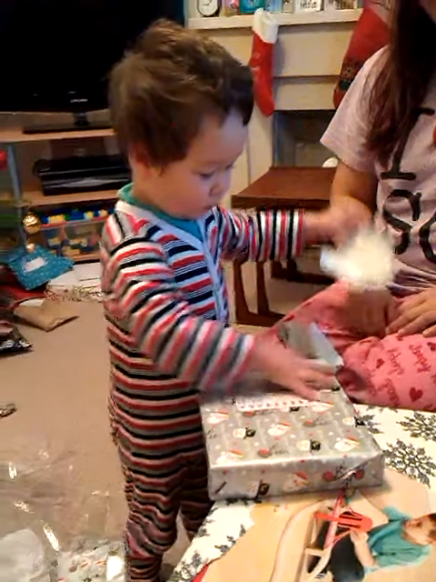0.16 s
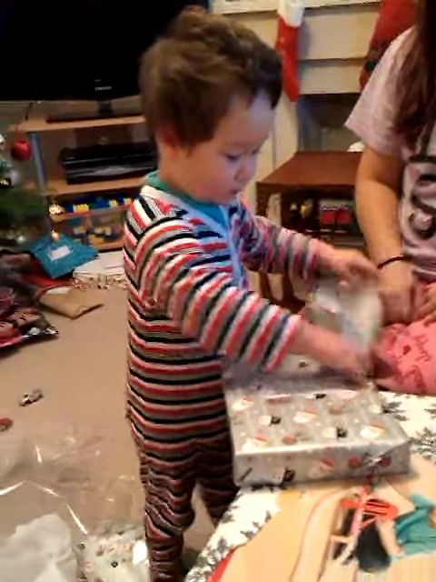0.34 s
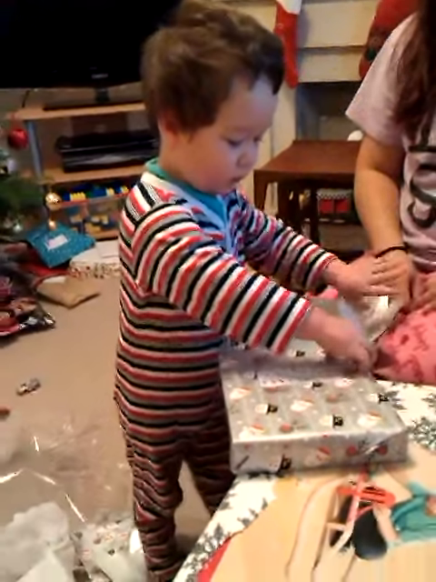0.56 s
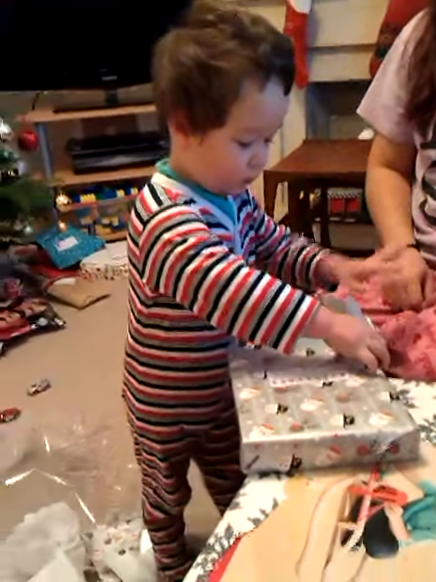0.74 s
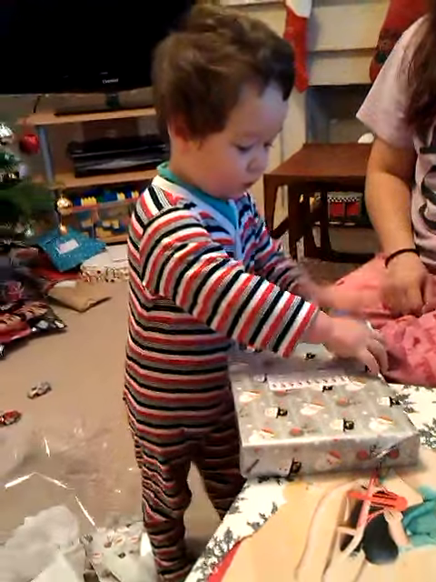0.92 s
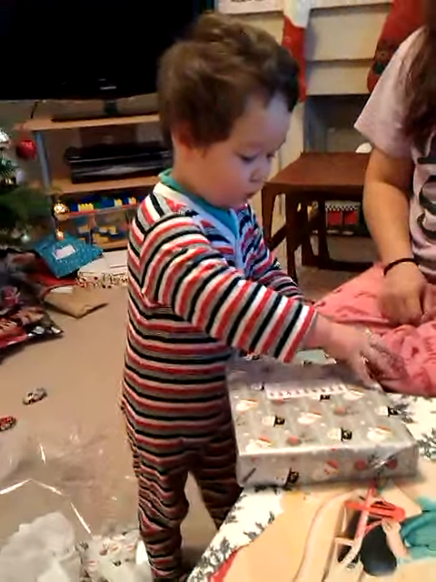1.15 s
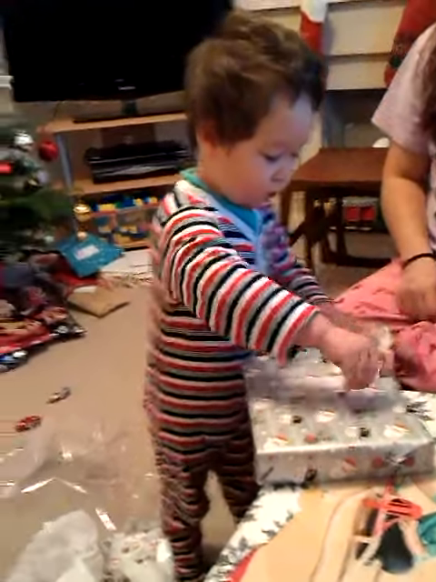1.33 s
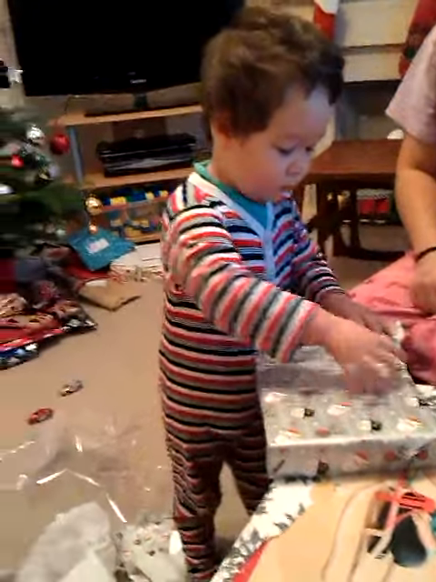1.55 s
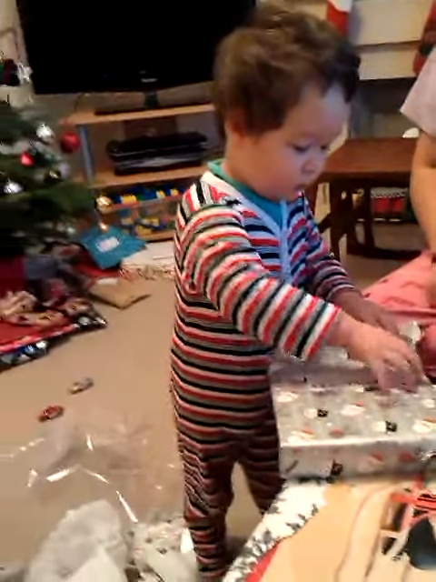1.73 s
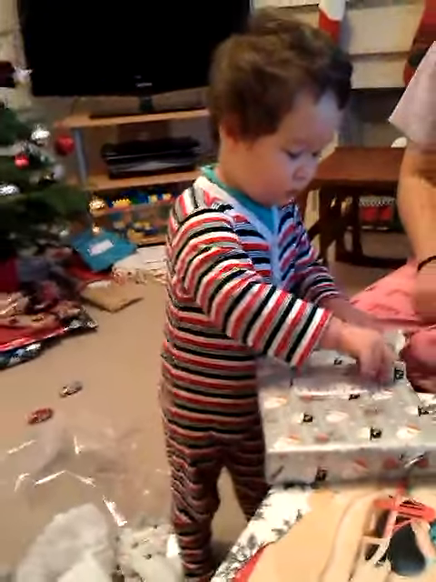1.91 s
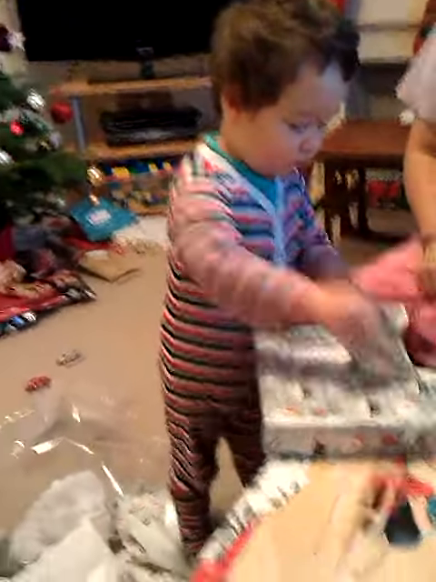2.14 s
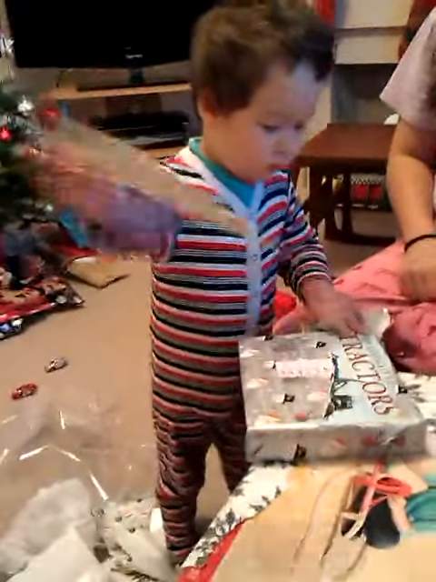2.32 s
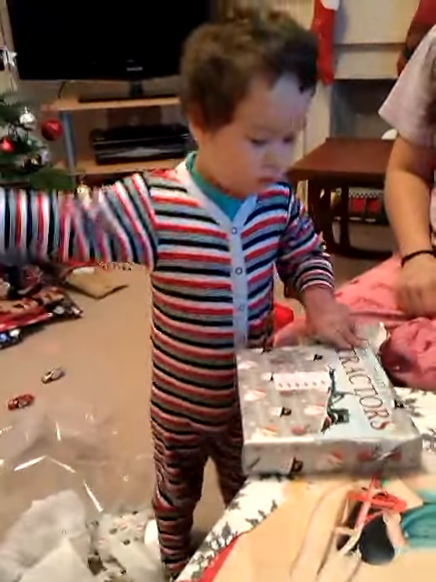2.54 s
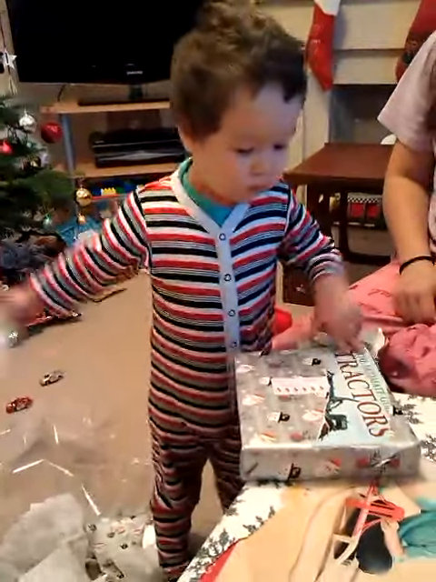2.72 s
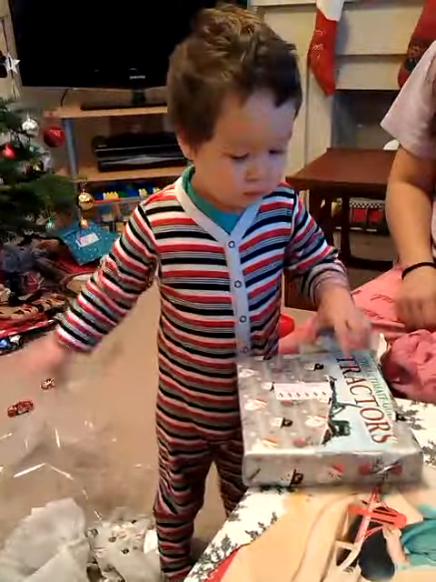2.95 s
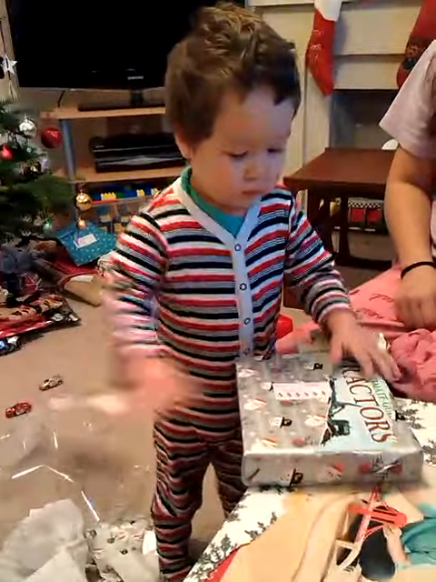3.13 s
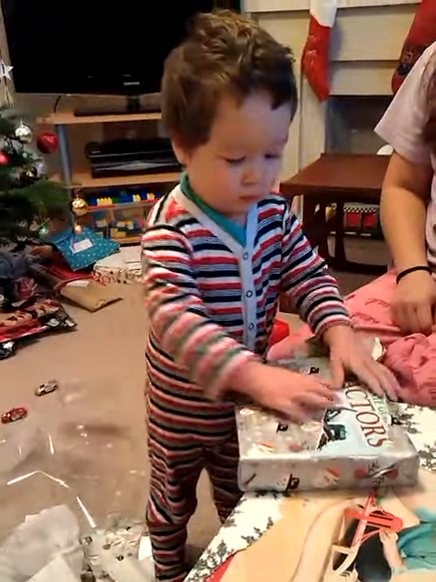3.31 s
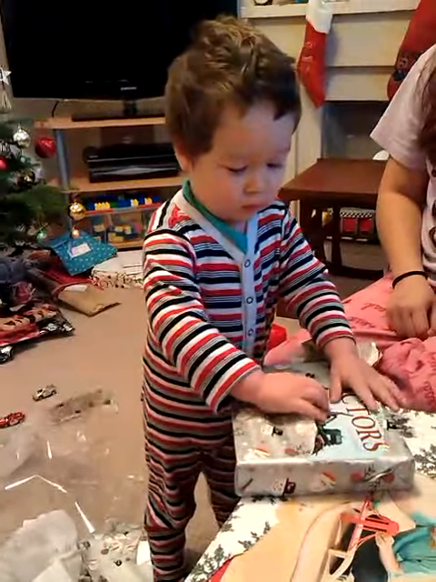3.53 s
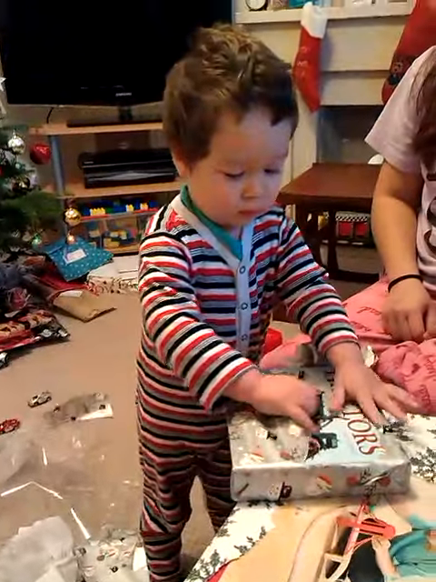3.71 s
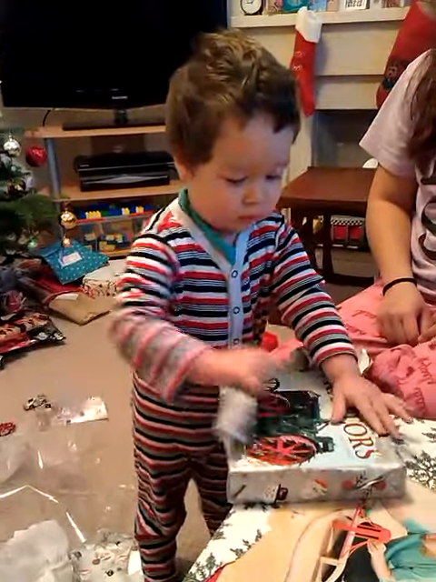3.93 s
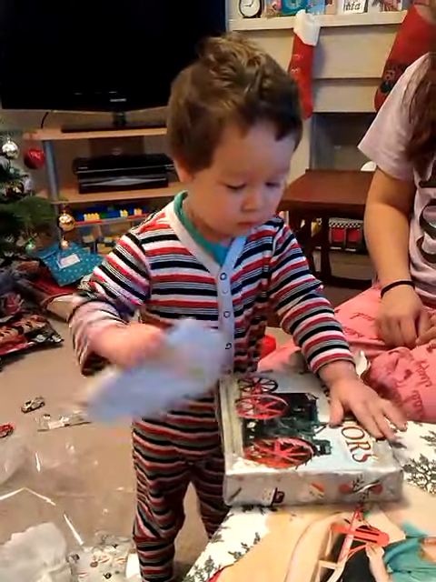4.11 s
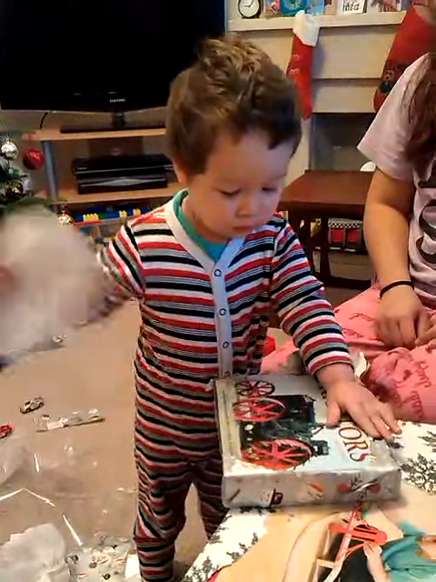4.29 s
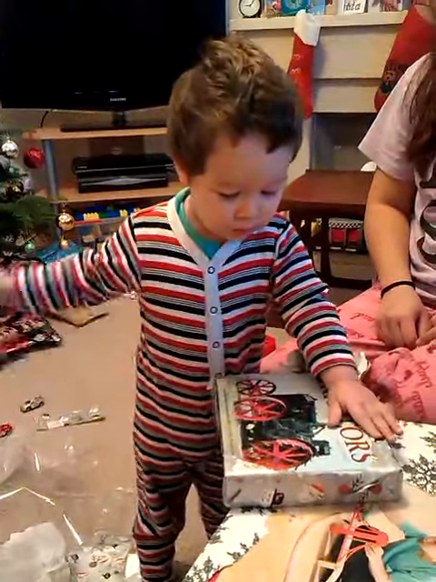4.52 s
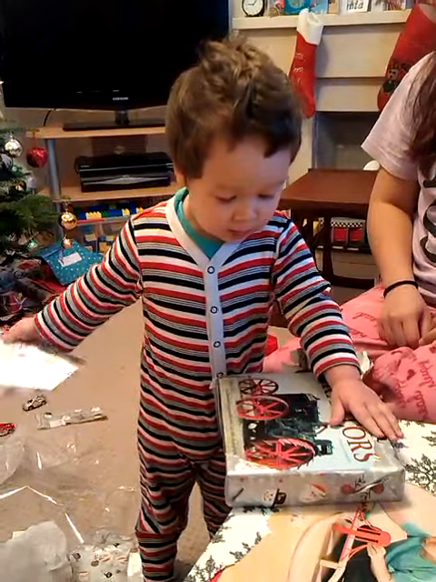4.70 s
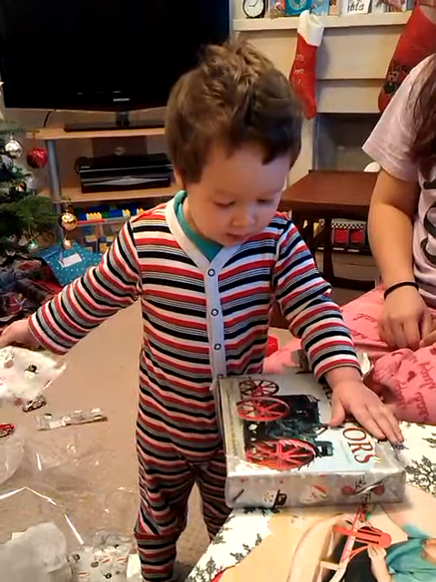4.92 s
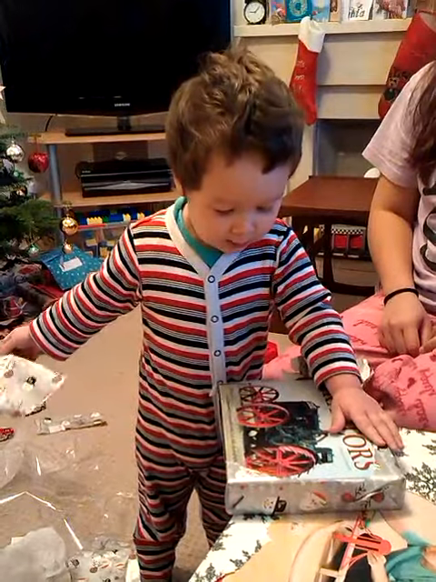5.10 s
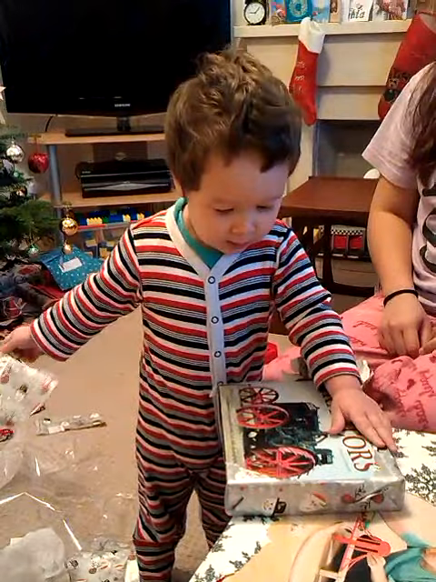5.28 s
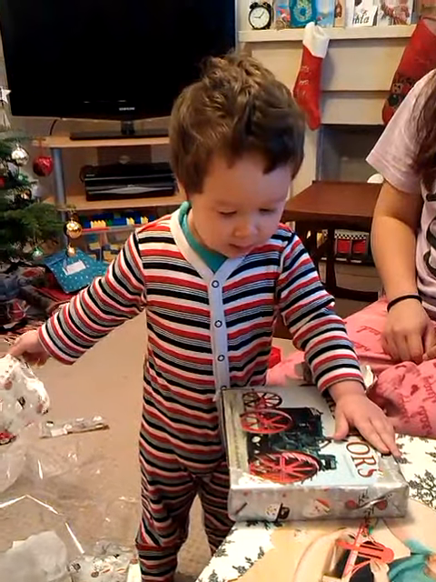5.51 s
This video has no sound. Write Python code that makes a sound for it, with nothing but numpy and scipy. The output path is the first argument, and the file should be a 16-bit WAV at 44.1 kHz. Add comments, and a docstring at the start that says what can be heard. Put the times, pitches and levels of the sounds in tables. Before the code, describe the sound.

A small child unwraps a boxed gift, heard from about a metre away in a carpeted living room with a brief echo and a faint steady hush and hum. For the first second, wrapping paper rustles and scrapes softly under the fingers, with small crackles and a few dull bumps on the cardboard box, the clearest at about 0.4 seconds. A short, bright rip comes at 1.2 seconds, followed by another soft bump and light crinkling. At about 2.0 seconds a fast tear swells to the loudest moment and stops sharply at 2.3. Faint rustling follows, with a sharp crackle at 3.7. From 3.8 to 4.3 seconds a longer tear builds, full of crisp snaps and peaking near 4.1. A few faint crinkles trail off by 4.9 seconds, leaving only the quiet room until the end, at around 5.5 seconds.

```python
"""Wrapping paper rustles and crackles, then rips three times: a small child is opening a boxed gift.
Friction under the fingers gives the hiss and scrapes, buckling creases tick, and hands bump the box.
Each rip is a swarm of fibre fractures that shakes the loose sheet and the cardboard box under it.
The carpeted living room answers briefly, over a steady hush and a faint hum."""
import sys
import numpy as np
from scipy import signal
from scipy.fft import rfft, irfft, next_fast_len
from scipy.io import wavfile
from scipy.ndimage import uniform_filter1d, map_coordinates

SR = 44100
rng = np.random.default_rng(int(sys.argv[2]) if len(sys.argv) > 2 else 0)


def pcm_store(signal):
    """Save signal as 16-bit PCM."""
    levels = np.round(np.clip(np.atleast_2d(signal), -1, 1) * 32767)
    wavfile.write(sys.argv[1], SR, levels.astype(np.int16).T)


N = 244799
BOX_EDGE_HZ, SHEET_EDGE_HZ, STRIP_EDGE_HZ = 500, 1400, 3500  # upper edge of each part's band


def amp(db):
    """Amplitude ratio of a level in decibels."""
    return 10 ** (np.asarray(db) / 20)


def unit(x):
    """Normalisation to an rms of 1."""
    return x / np.sqrt(np.mean(x ** 2) + 1e-20)


def along(points, hz):
    """Interpolation of (f/Hz, value) points on a logarithmic frequency axis."""
    f, value = np.transpose(points)
    return np.interp(np.log(hz + 1), np.log(f + 1), value)


def add(track, s, sound):
    """Superposition of a sound on the track, starting at s seconds."""
    start = round(s * SR)
    sound, start = sound[max(-start, 0):], max(start, 0)
    track[start:start + len(sound)] += sound[:max(N - start, 0)]


def coloured(x, gain):
    """Minimum-phase filter of magnitude gain(f): it is causal, so clicks keep their sharp fronts."""
    size = 2 * next_fast_len(len(x) // 2 + 4096)
    magnitude = np.maximum(gain(np.fft.rfftfreq(size, 1 / SR)), 1e-6)
    cepstrum = irfft(np.log(magnitude))
    cepstrum[1:size // 2] *= 2
    cepstrum[size // 2 + 1:] = 0
    return irfft(rfft(x, size) * np.exp(rfft(cepstrum)))[:len(x)]


def band(hz, lo, hi, steepness=12):
    """Magnitude response of a Butterworth band-pass."""
    return ((1 + (lo / (hz + 1)) ** steepness) * (1 + (hz / hi) ** steepness)) ** -.5


def wobble(length, rate):
    """Smooth random modulation: a spline through `rate` Gaussian knots a second."""
    knots = rng.standard_normal(int(length * rate / SR) + 4)
    return map_coordinates(knots, [np.arange(length) * rate / SR])


def background(hush_db=-65, hum_db=-73, hum_hz=94.3):
    """Noise floor of the house: stationary coloured noise and one faint low tone."""
    # spectrum of the hush: f/Hz, level/dB
    hush_spectrum = [(15, -36.5), (25, -0.5), (152, -7.5), (253, -13.5), (297, -8.5), (482, -19.5),
                     (537, -17), (2060, -21), (2230, -21), (15500, -28.5)]
    hush = unit(coloured(rng.standard_normal(N), lambda hz: amp(along(hush_spectrum, hz))))
    t = np.arange(N) / SR
    return amp(hush_db) * hush + amp(hum_db) * np.sin(2 * np.pi * hum_hz * t)


def wall_response(gap_s=.0054, build_s=.0043, echo_s=.0104, echo_db=-12):
    """Impulse response: one early reflection and a diffuse exponential tail whose treble dies first."""
    # reverberation time of the room: f/Hz, T60/s
    decay_times = [(150, .55), (400, 0.56), (1000, 0.34), (2800, 0.35), (7000, 0.33), (14000, 0.22)]
    hz, t, noise = signal.stft(rng.standard_normal(SR // 2), SR, nperseg=256)
    decay = amp(-60 * t / along(decay_times, hz)[:, None])
    tail = signal.istft(noise * decay, SR, nperseg=256)[1]
    tail *= np.clip((np.arange(len(tail)) / SR - gap_s) / build_s, 0, 1)
    tail /= np.linalg.norm(tail)
    tail[round(echo_s * SR)] += amp(echo_db)
    return tail


def room(x, size=4096):
    """Time-varying reverberation: the paper moves, so each short stretch meets the walls in a new way."""
    # spectral weighting of the reflected sound: f/Hz, level/dB
    wall_spectrum = [(150, -2.5), (1000, 0), (2500, 2.5), (6000, -0.5), (12000, -0.5)]
    track, padded = np.zeros(N), np.pad(x, size)
    fade = np.sin(np.pi * (np.arange(size) + .5) / size)
    for start in range(size // 2, N + size, size // 2):
        stretch = padded[start:start + size] * fade
        add(track, (start - size) / SR, signal.fftconvolve(stretch, wall_response()))
    return coloured(track, lambda hz: amp(along(wall_spectrum, hz)))


def box_bumps(lid_hz=120, t60=.018, rise_s=.00054):
    """Damped oscillation: the box lid gives one or two swings under a hand."""
    # soft impacts on the box: t/s, peak level/dB
    impacts = [(0.207, -46), (0.417, -36), (0.602, -48), (0.976, -50), (1.479, -44), (2.811, -53)]
    track, t = np.zeros(N), np.arange(SR // 8) / SR
    envelope = amp(-60 * t / t60) * (1 - np.exp(-t / rise_s))
    swing = envelope * np.sin(2 * np.pi * lid_hz * t)
    for s, db in impacts:
        add(track, s, amp(db) * swing / swing.max())
    return track


def patch(force, hz, octaves):
    """Resonant radiation: a patch of paper filters a force through one peak; the result has rms 1."""
    # radiation spectrum of paper: f/Hz, level/dB
    paper_spectrum = [(300, -4.5), (1000, -3), (6500, -3), (8500, -7), (10500, -22.5), (15500, -28)]

    def gain(f):
        detuning = np.log2((f + 1) / hz) / octaves
        return amp(along(paper_spectrum, f)) / (1 + detuning ** 2)

    return unit(coloured(force, gain))


def scrapes(roughness_db=1.4):
    """Resonance driven by a swell of uneven noise: stick-slip scrapes or, if short and low, thuds."""
    # scrapes and rings of paper, and two short dull thuds:
    # middle t/s, duration/s, level/dB, f/Hz, half-width/octaves
    patches = [(0.023, 0.3, -54.5, 870, 0.47), (0.21, .016, -41.5, 790, .25),
               (0.384, 0.063, -53.5, 2610, 0.85), (0.513, 0.044, -55, 7400, 1.1),
               (0.587, 0.045, -54, 2400, 1.1), (0.686, 0.043, -53, 2040, 0.84),
               (0.739, 0.065, -50, 5970, 2.8), (0.921, 0.052, -52.5, 5180, 0.13),
               (1.034, 0.12, -53.5, 1200, 3), (1.182, .026, -37.5, 5000, .3),
               (1.254, 0.015, -30.5, 1800, 0.41), (1.488, 0.02, -49.5, 5140, 5.3),
               (1.663, 0.24, -61.5, 1440, 0.16), (1.892, 0.078, -54, 1410, 0.94),
               (2.103, 0.063, -30, 1500, 0.64), (2.262, 0.034, -23, 2175, 0.67),
               (2.566, 0.064, -57.5, 1570, 2.5), (2.888, 0.058, -59.5, 5000, 1.5),
               (3.493, 0.022, -54, 2000, 4), (3.557, 0.13, -59.5, 1570, 0.92),
               (3.694, .014, -50.5, 260, 0.8), (3.767, 0.11, -49, 4500, 1.7),
               (3.848, 0.087, -39, 1970, 0.17), (4.0, 0.069, -30, 990, 0.41),
               (4.138, 0.057, -23.5, 2286, 0.29), (4.246, 0.024, -29.5, 2940, 0.16),
               (4.831, 0.016, -57, 2190, 1.05)]
    track, settle = np.zeros(N), 256  # samples for the resonance to build up
    for s, duration, db, hz, octaves in patches:
        swell = np.hanning(round(duration * SR))
        noise = patch(rng.standard_normal(len(swell) + settle), hz, octaves)[settle:]
        rough = unit(noise * amp(roughness_db * wobble(len(swell), rate=250)))
        add(track, s - duration / 2, amp(db) * swell * rough)
    return track


def creases(delay_s=.0004, rise_s=.0003, snap_db=-1, pop_db=-19):
    """Snap-through buckling: a crease snaps and shivers; the sheet around it pops more dully."""
    # creases that buckle: t/s, rms level over 40 ms/dB, f/Hz, half-width/octaves
    buckles = [(0.0901, -53.5, 4300, .7), (.208, -50, 1500, 1.6), (.448, -55.5, 4750, 1.6),
               (0.6652, -52.5, 1900, 0.23), (.761, -59, 3850, .65), (.776, -50.5, 4070, 1.1),
               (0.932, -53, 5300, 0.3), (0.9946, -53.5, 5300, .5), (1.0031, -49, 4200, 1.2),
               (1.045, -56, 5200, 0.54), (1.1997, -40, 5560, .5), (1.228, -46, 6500, .2),
               (1.5833, -52.5, 4300, 1.3), (1.7553, -45, 6050, 0.2), (1.9464, -43.5, 5860, .5),
               (2.0153, -53, 5526, 1.4), (2.0311, -46, 6370, .3), (2.0558, -41.5, 6700, .2),
               (2.0741, -36.5, 2700, 2.3), (2.107, -44, 3780, 1.1), (2.819, -68, 1000, .8),
               (3.6921, -37, 5520, 1.8), (3.8237, -46, 2470, 1.1), (3.8719, -46, 4910, 2.7),
               (3.9127, -39.5, 4550, 1.2), (4.0008, -32.5, 4170, 3.7), (4.137, -32.5, 2800, 1),
               (4.1572, -27.5, 7000, .45), (4.2441, -41, 3226, 0.77), (4.4662, -58, 2520, .8),
               (4.62, -54, 5850, 1.6), (4.6278, -55, 2820, .8), (4.6784, -53, 3290, 1.4)]
    track, t = np.zeros(N), np.arange(SR // 25) / SR
    onset = 1 - np.exp(-(t / rise_s) ** 2)
    snap = amp(snap_db) * unit(signal.unit_impulse(len(t), 20))

    def shiver(t60):
        return unit(rng.standard_normal(len(t)) * amp(-60 * t / t60) * onset)

    for s, db, hz, octaves in buckles:
        tick = patch(snap + shiver(t60=.014), hz, octaves)
        pop = amp(pop_db) * patch(shiver(t60=.015), hz=1400, octaves=1.2)
        add(track, s + delay_s, amp(db) * unit(tick + pop))
    return track


def snaps(length, rate, spread_db=1.5):
    """Poisson process: `rate` impulses a second on average, with clipped log-normal strengths."""
    occurs = rng.random(length) < rate / SR
    return occurs * amp(spread_db * np.clip(rng.standard_normal(length), -3, 2))


def stroke(rows, spectrum, edges_hz, rate, hiss, catch_db):
    """Shot noise of moving paper: one train of snaps, with added hiss, drives every band."""
    s, *levels = np.transpose(rows)  # t/s, then level/dB of each band from the highest down
    t = np.arange(s[0] - .02, s[-1] + .02, 1 / SR)
    gate = np.clip(np.minimum(t - s[0], s[-1] - t) / .004 + .5, 0, 1) ** .5
    speed = amp(.4 * (np.interp(t, s, levels[0]) + 29.5))  # a louder movement is faster and snaps more
    drive = unit(snaps(len(t), rate * speed))
    catch = amp(catch_db * wobble(len(t), rate=220))  # the paper catches and gives, so the force varies
    sound, track = np.zeros(len(t)), np.zeros(N)
    for db, lo, hi in zip(levels, edges_hz[1:], edges_hz):
        force = catch * (drive * rng.standard_normal(len(t)) + hiss * rng.standard_normal(len(t)))
        part = coloured(force, lambda hz: amp(along(spectrum, hz)) * band(hz, lo, hi))
        # the hand sets how much energy is released over about 20 ms
        power = np.abs(uniform_filter1d(part ** 2, size=900))
        sound += part / np.sqrt(power + 1e-20) * amp(np.interp(t, s, db))
    add(track, t[0], sound * gate)
    return track


def rustle(rub_db=.5):
    """Friction noise: fingers shift the wrapping, and tiny ticks and hiss follow their effort."""
    # effort of the fingers, one curve for each spell of handling: t/s, level/dB
    efforts = [
        [(0.0, -61.5), (0.176, -62.5), (0.284, -65.5), (0.47, -60.5), (0.598, -64.5), (0.738, -64.5),
         (0.884, -66), (1.022, -57), (1.16, -63), (1.18, -51.5)],
        [(1.585, -57), (1.663, -63), (2.04, -53)],
        [(2.55, -67.5), (2.776, -67), (2.92, -63.5)],
        [(3.12, -65), (3.234, -69), (3.74, -59.5), (3.8, -56)],
        [(4.5, -67), (4.68, -68), (4.85, -70.5)],
    ]
    # spectrum of rubbed paper: f/Hz, level/dB
    spectrum = [(120, -46), (200, -3.5), (304, -7), (407, -11), (446, -5.5), (630, -8), (755, -4.5),
                (1910, -8.5), (3480, -11), (5800, -1), (15500, -26.5)]
    edges_hz = [SR, STRIP_EDGE_HZ, 120]  # bands: fine crackle, rubbed sheet
    track = np.zeros(N)
    for curve in efforts:
        rows = [(s, db, db + rub_db) for s, db in curve]
        track += stroke(rows, spectrum, edges_hz, rate=4500, hiss=1.0, catch_db=3.5)
    return track


def rips(strip_growth=.12, sheet_growth=.3):
    """Fracture and forced vibration: fibres break by the thousand and shake strip, sheet and box."""
    # the pull on the paper, one curve for each rip: t/s, tear level/dB, box level/dB
    pulls = [
        [(1.196, -36.5, -63), (1.24, -37, -75), (1.252, -25, -55), (1.266, -22.5, -46), (1.27, -29.5, -38.5)],
        [(2.045, -31, -68.5), (2.053, -40.5, -70.5), (2.081, -32.5, -56), (2.111, -27.5, -63.5),
         (2.127, -32, -49), (2.151, -25.5, -42), (2.209, -20.5, -53), (2.243, -20, -50.5),
         (2.278, -20.5, -54.5)],
        [(3.81, -45, -57.5), (3.822, -42, -60.5), (3.918, -33.5, -58), (3.96, -34, -57), (4.006, -29, -48.5),
         (4.07, -27, -41), (4.136, -24, -46), (4.224, -36, -56.5), (4.246, -26, -68), (4.255, -34, -54)],
    ]
    # radiation at full pull relative to the fibres, one row a rip: strip level/dB, sheet level/dB
    couplings = [(-11.5, -15.5), (-4.5, -14), (-1.5, -10.5)]
    # spectra of the three rips: f/Hz, level/dB
    short_rip = [(47, -59), (80, -12), (446, -14), (498, -27), (774, -13), (1870, -13.5), (3240, -15.5),
                 (6500, -5.5), (8550, -22.5), (13300, -32.5), (15500, -61.5)]
    fast_rip = [(47, -62), (80, -29), (155, -11), (366, -9.5), (487, -19.5), (594, -12.5), (1030, -7.5),
                (1180, -12), (1400, -6), (2000, -4), (3390, -7.5), (5620, -2.5), (7010, -6), (9760, -22.5),
                (15500, -27.5)]
    long_rip = [(47, -39.5), (80, -14.5), (150, -5), (225, -11.5), (287, -11.5), (400, -12.5), (427, -11.5),
                (556, -11), (1010, -2), (1500, -4.5), (2660, -3), (3460, -1.5), (6860, 3), (8930, -5.5),
                (13600, -34), (15500, -35)]
    edges_hz = [SR, STRIP_EDGE_HZ, SHEET_EDGE_HZ, BOX_EDGE_HZ, 60]  # bands: fibres, strip, sheet, box
    track = np.zeros(N)
    for curve, (strip_db, sheet_db), spectrum in zip(pulls, couplings, [short_rip, fast_rip, long_rip]):
        s, pull, box = np.transpose(curve)
        slack = pull.max() - pull
        # a harder pull moves more paper: growth is the extra dB for each dB of pull
        strip = pull + strip_db - strip_growth * slack
        sheet = pull + sheet_db - sheet_growth * slack
        rows = np.transpose([s, pull, strip, sheet, box])
        track += stroke(rows, spectrum, edges_hz, rate=3200, hiss=.29, catch_db=-.26)
    return track


def scene():
    """Superposition of direct sound from about a metre away, the paper's reverberation and the hush."""
    tearing, fingers, patches, ticks = rips(), rustle(), scrapes(), creases()
    direct = amp(-1.0) * tearing + amp(-2.5) * fingers + patches + ticks + box_bumps()
    reflected = room(amp(-8.0) * tearing + amp(-9.5) * fingers + amp(-7.0) * patches + amp(-4.5) * ticks)
    return (direct + reflected + background())[None]


def record(dry, cutoff_hz=15850):
    """Band limiting: an ideal low-pass removes everything above the cutoff."""
    size = next_fast_len(N + SR // 4)
    passband = np.fft.rfftfreq(size, 1 / SR) < cutoff_hz
    return irfft(rfft(dry, size) * passband, size)[:, :N]


dry = scene()
out = record(dry)
pcm_store(out)
```